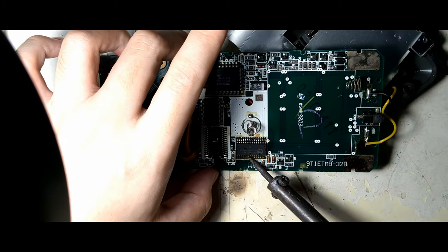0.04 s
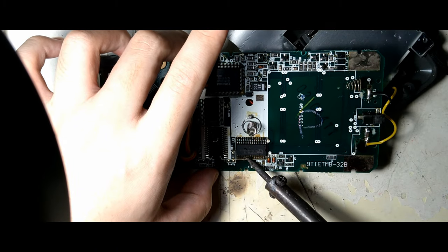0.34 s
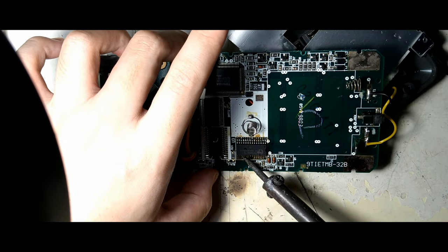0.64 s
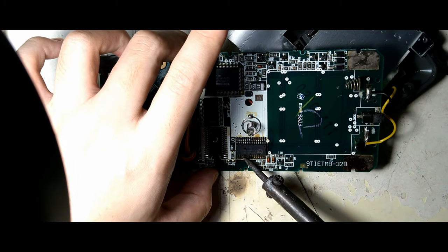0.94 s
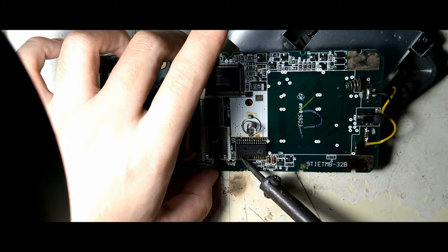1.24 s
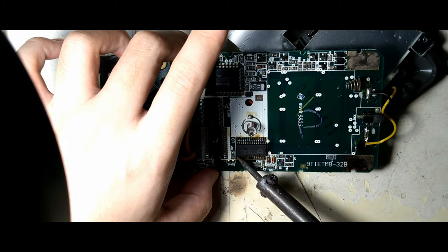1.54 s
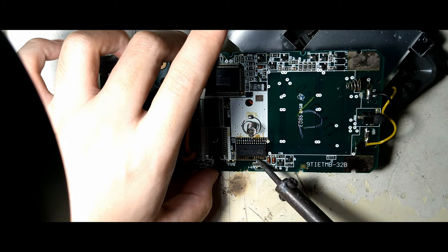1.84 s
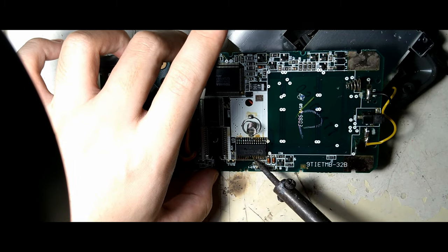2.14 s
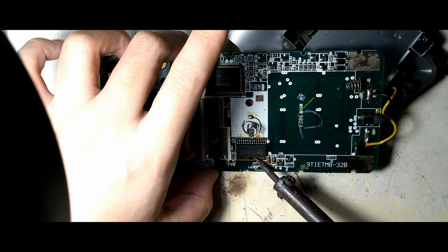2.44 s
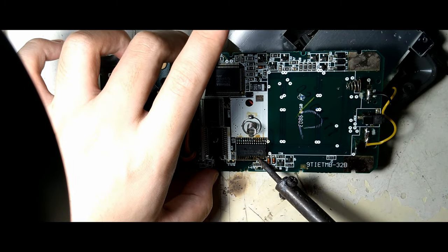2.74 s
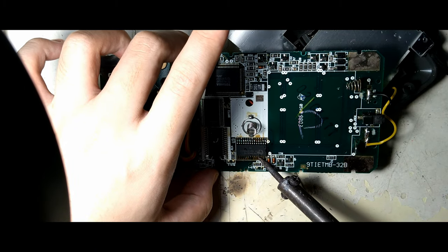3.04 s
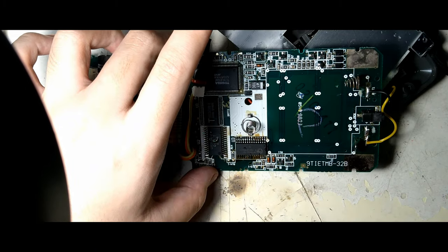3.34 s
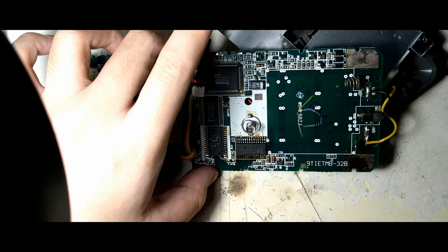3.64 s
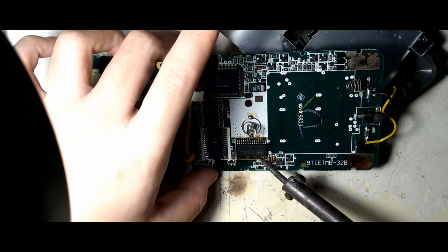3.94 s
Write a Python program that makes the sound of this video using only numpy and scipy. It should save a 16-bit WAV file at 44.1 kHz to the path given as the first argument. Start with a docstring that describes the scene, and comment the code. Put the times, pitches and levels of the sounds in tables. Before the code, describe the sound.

Steady room hiss and low rumble, with a soldering iron faintly sizzling on a circuit board.

```python
"""From the start a quiet workroom hisses and rumbles, a fan whirs, a motor hums and a distant
engine drones in the room's low resonances. Soft bumps travel through the bench to the microphone
as flux begins to sizzle faintly under a soldering iron. A hand rustles on the circuit board, which
creaks dully as the fingers adjust their grip. Near 3 s the iron is lifted and the sizzle sinks;
half a second later it touches down again."""
import sys
import numpy as np
from scipy.fft import rfft, irfft, next_fast_len
from scipy.io import wavfile
from scipy.ndimage import map_coordinates

SR = 44100
rng = np.random.default_rng(int(sys.argv[2]) if len(sys.argv) > 2 else 0)


def to_wav(s):
    """Save 16-bit WAV."""
    ch = np.atleast_2d(s).T  # columns
    pcm = np.round(np.clip(ch, -1, 1) * 32767)  # PCM
    wavfile.write(sys.argv[1], SR, pcm.astype(np.int16))


N = 176400


def amp(db):
    """Decibels to amplitude ratio."""
    return 10 ** (np.asarray(db) / 20)


def unit(x):
    """Normalise to rms 1."""
    return x / np.sqrt(np.mean(x ** 2) + 1e-20)


def along(points, hz):
    """Interpolate (Hz, value) points on a logarithmic frequency axis."""
    freqs, values = np.transpose(points)
    return np.interp(np.log(hz + 1), np.log(freqs + 1), values)


def curves(rows):
    """Interpolate each column after the time to one value per sample."""
    times, *columns = np.transpose(rows)
    return [np.interp(np.arange(N) / SR, times, column) for column in columns]


def wobble(rate):
    """Random modulation: a smooth curve with rate knots a second."""
    return map_coordinates(rng.standard_normal(1024), [np.arange(N) * rate / SR], mode="mirror")


def filtered(x, response):
    """Linear filtering: the spectrum of x is multiplied by a frequency response."""
    size = next_fast_len(N + SR // 2)
    return irfft(rfft(x, size) * response(np.fft.rfftfreq(size, 1 / SR)), size)[:N]


def noise(spectrum):
    """White noise shaped by a spectrum, at rms 1."""
    return unit(filtered(rng.standard_normal(N), lambda hz: amp(along(spectrum, hz))))


def tone(hz):
    """A sine of rms 1 whose phase is the integral of its frequency."""
    return np.sqrt(2) * np.sin(2 * np.pi * (np.cumsum(hz) / SR + rng.random()))


def room():
    """The noise floor is a sum of air, rumble, a wavering low room note and microphone hiss."""
    # Each row of these spectra: frequency in Hz, relative level in dB.
    air_spectrum = [(100, 1.5), (170, -0.5), (225, -2), (275, -2.5), (325, -2), (410, -5.5), (470, -3.5),
                    (530, -3.5), (660, -7), (820, -9), (915, -6.5), (1030, -10.5), (1500, -15), (2100, -17),
                    (2400, -21), (2750, -17.5), (3200, -19.5), (4400, -38), (8000, -48)]
    rumble_spectrum = [(8, -5.5), (20, 2), (32, 2), (52, 2.5), (62, -0.5), (72, 1.5), (82, -7.5),
                       (100, -5.5), (130, -11), (170, -15), (300, -44), (800, -120)]
    hiss_spectrum = [(1000, 2), (3000, 2), (3800, 6.5), (4600, 0.5), (5700, 2), (6300, 4.5), (6850, 8),
                     (7100, 11), (7300, 0), (7600, 2), (8500, -4.5), (10000, -5), (12000, -6)]
    fade_db = 0.4 * np.arange(N) / SR
    air = amp(-59 + 0.25 * wobble(rate=8.83)) * noise(air_spectrum)
    rumble = amp(-52 - fade_db + 0.89 * wobble(rate=4.08)) * noise(rumble_spectrum)
    boom = amp(-60.5 + 3.4 * wobble(rate=3.92)) * tone(hz=61.93 + 0.93 * wobble(rate=6))
    hiss = amp(-72) * noise(hiss_spectrum)
    return air + rumble + boom + hiss


def fan():
    """Resonance: a fan's moving air excites narrow bands that sing faintly."""
    # Each row: centre frequency in Hz, half-width in Hz, level in dB.
    resonances = [(217.5, 5.6, -73.5), (243.1, 4.6, -76), (324.4, 16, -75.5), (514.5, 14, -77),
                  (559, 30, -75.5), (718, 12, -83.5), (912, 22, -77.5)]
    whir = np.zeros(N)
    for centre, half_width, db in resonances:
        band = filtered(rng.standard_normal(N), lambda hz: 1 / (1 + ((hz - centre) / half_width) ** 2))
        whir += amp(db) * unit(band)
    return whir


def motor():
    """An electric motor hums in a harmonic series; the fundamental fades and returns, overtones stay."""
    # Each row: time in seconds, level of the fundamental in dB.
    envelope = [(0, -51.5), (.3, -45.5), (.7, -51.5), (1.05, -47.5), (1.18, -61.5), (1.33, -47),
                (1.7, -50.5), (1.95, -55.5), (2.5, -59), (3.2, -65), (3.5, -64), (3.85, -52), (4, -54)]
    # Each row: harmonic number, level in dB.
    overtones = [(2, -67.5), (3, -66.5)]
    level_db, = curves(envelope)
    hz = 48.43 + 0.19 * wobble(rate=4)
    fundamental = amp(level_db) * tone(hz)
    return fundamental + sum(amp(db + 1.2 * wobble(rate=4.5)) * tone(k * hz) for k, db in overtones)


def engine():
    """Forced resonance: an engine slows twice, and its orders swell as they slide through room modes."""
    # Each row: time in seconds, rotation rate in Hz, level in dB before the room's gain.
    running = [(0, 28.53, -63), (.45, 28.45, -62), (.72, 26.9, -63), (1, 25.15, -57.5), (1.2, 26, -86),
               (1.42, 32.28, -57), (1.8, 31.2, -63.5), (2.1, 30.5, -55), (2.35, 29.42, -57.5),
               (2.57, 28.6, -56), (2.85, 27.54, -61.5), (3.05, 26.3, -59.5), (3.35, 25.22, -69),
               (3.52, 26.16, -73.5), (3.83, 31.53, -58.5), (4, 31.55, -78)]
    # Each entry: a multiple of the rotation rate.
    orders = [3, 4, 5]
    # Each row: frequency in Hz, gain in dB.
    room_response = [(78, -2.5), (82.5, 10), (86.5, -6.5), (91, 1), (97, 3), (108, -8.5), (114.5, 8),
                     (120, -6.5), (126, -3.5), (135, -9), (160, -11)]
    hz, level_db = curves(running)
    return sum(amp(level_db + along(room_response, k * hz)) * tone(k * hz) for k in orders)


def bumps():
    """Damped oscillation: each nudge rocks the bench for a cycle or two."""
    # Each row: start in seconds, level in dB at which the decay begins, push (+1) or release (-1).
    nudges = [(0.245, -33.5, 1), (0.406, -36, 1), (1.024, -29.5, 1), (1.188, -37, 1), (1.232, -35.5, 1),
              (1.326, -30.5, 1), (1.384, -30.5, -1), (1.487, -35, -1)]
    bench_hz, rise_s, t60_s = 30.2, 0.0022, 0.12
    rocking = np.zeros(N)
    for start, db, direction in nudges:
        age = np.maximum(np.arange(N) / SR - start, 0)
        envelope = amp(db - 60 * age / t60_s) * (1 - np.exp(-age / rise_s))
        rocking += direction * envelope * np.sin(2 * np.pi * bench_hz * age)
    return rocking


def sizzle():
    """Tiny, dense bubbles of boiling flux add incoherently into a hiss; a harder boil is brighter."""
    # Each row: time in seconds, level of the boil in dB.
    envelope = [(0, -90), (.28, -84), (.45, -72.5), (.63, -74.5), (.665, -84), (.69, -79), (.72, -75),
                (.81, -78.5), (.95, -70.8), (1.05, -75), (1.14, -74), (1.3, -78.5), (1.7, -74.5),
                (1.95, -73), (2.07, -70.5), (2.12, -78), (2.24, -76.5), (2.31, -72), (2.48, -72.5),
                (2.58, -69.5), (2.72, -70.5), (2.82, -67), (2.89, -67), (2.94, -71.5), (2.99, -81),
                (3.5, -80), (3.55, -71.5), (3.65, -74.5), (3.73, -69), (3.85, -71), (3.94, -79), (4, -76)]
    # Each row of these spectra: frequency in Hz, relative level in dB.
    boil_spectrum = [(2500, -27), (4200, -15.5), (5000, -9.5), (5600, -13.5), (6300, -5.5), (6800, -2.5),
                     (7100, -2), (7350, 0), (7650, -11), (8500, -12.5), (10000, -21), (12000, -32)]
    spray_spectrum = [(4000, -25), (6000, -6), (7200, 6), (8500, -1.5), (10000, -10), (12000, -15.5)]
    level_db, = curves(envelope)
    sputter_db = wobble(rate=30)
    spray_db = -75 + 1.4 * (level_db - level_db.max())  # spray grows faster than the boil
    return amp(level_db + sputter_db) * noise(boil_spectrum) + amp(spray_db) * noise(spray_spectrum)


def friction(strokes, spectrum):
    """Friction noise: skin rubs the board in short Gaussian swells."""
    t = np.arange(N) / SR
    swells = sum(amp(db) * np.exp(-(2 * (t - centre) / length) ** 2) for centre, length, db in strokes)
    return swells * noise(spectrum)


def rustle():
    """Sliding friction: the hand shifts on the board with a soft midrange noise."""
    # Each row: centre time in seconds, length in seconds, level at the crest in dB.
    shifts = [(.3, 0.097, -67.5), (0.938, 0.076, -68), (2.84, 0.13, -71), (3.089, 0.094, -70.5)]
    # Each row: frequency in Hz, relative level in dB.
    spectrum = [(300, -6), (700, 2), (1200, 9), (2000, -5), (4000, -8), (8000, -29)]
    return friction(shifts, spectrum)


def creak():
    """Friction of the fingers adjusting their grip draws a dull, low creak from the board."""
    # Each row: centre time in seconds, length in seconds, level at the crest in dB.
    grips = [(1.15, .1, -64), (1.235, .04, -64.5), (1.305, 0.06, -61.5)]
    # Each row: frequency in Hz, relative level in dB.
    spectrum = [(100, -27), (190, -5.5), (245, 3), (300, -11), (420, -19), (900, -47), (2000, -120)]
    return friction(grips, spectrum)


def scene():
    """Superposition: the pressures of all sources add at one microphone."""
    return (room() + fan() + motor() + engine() + bumps() + sizzle() + rustle() + creak())[None]


def record(dry):
    """Band limiting: an ideal low-pass filter removes the highest treble."""
    cutoff_hz = 12080
    return np.array([filtered(channel, lambda hz: hz < cutoff_hz) for channel in dry])


dry = scene()
out = record(dry)
to_wav(out)
```